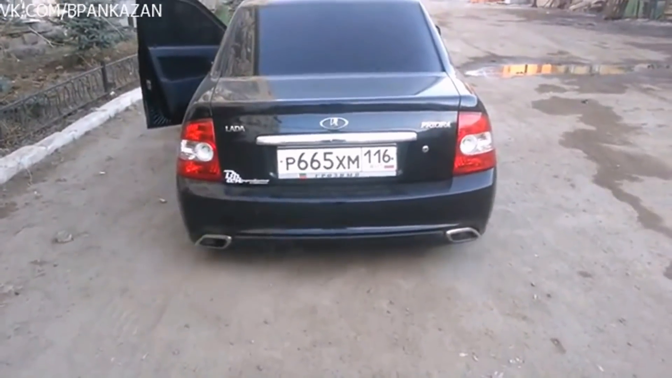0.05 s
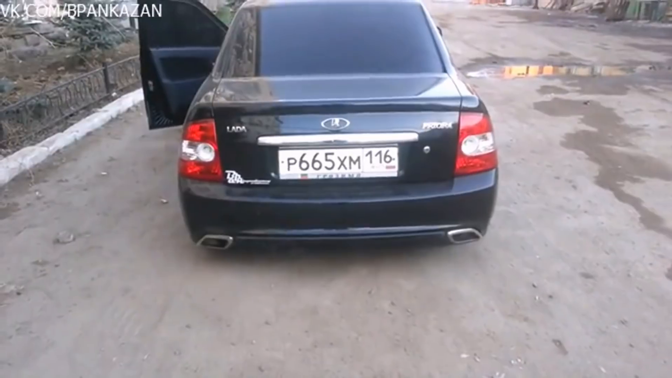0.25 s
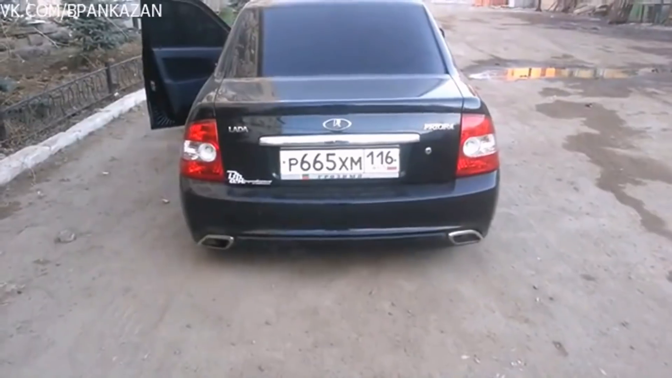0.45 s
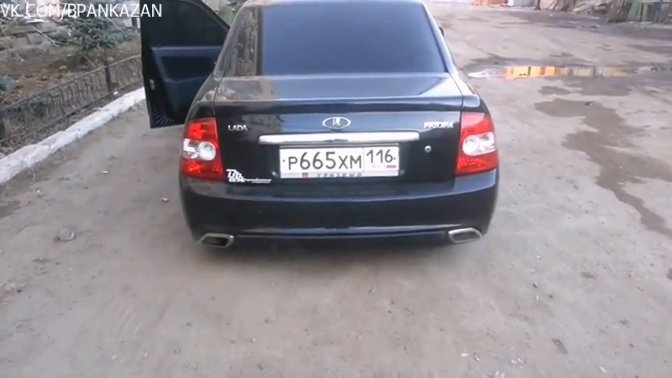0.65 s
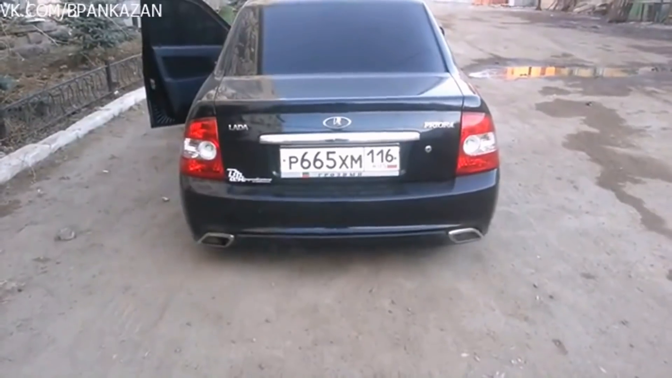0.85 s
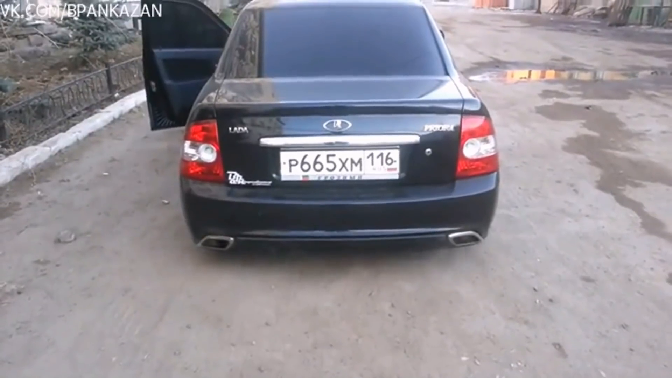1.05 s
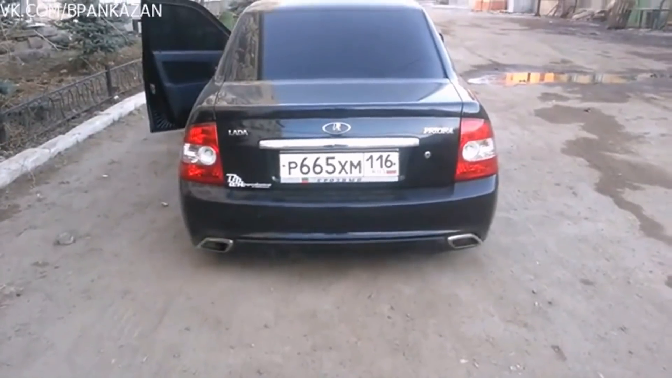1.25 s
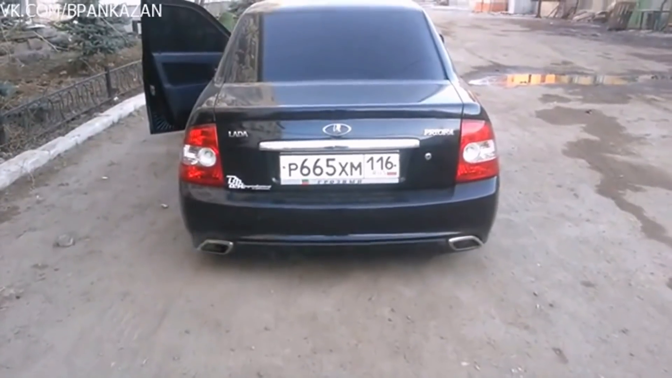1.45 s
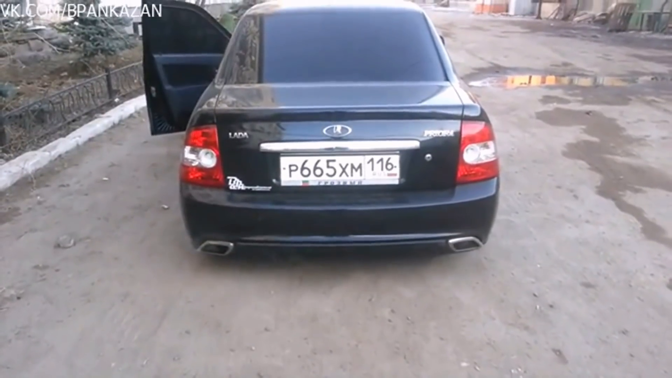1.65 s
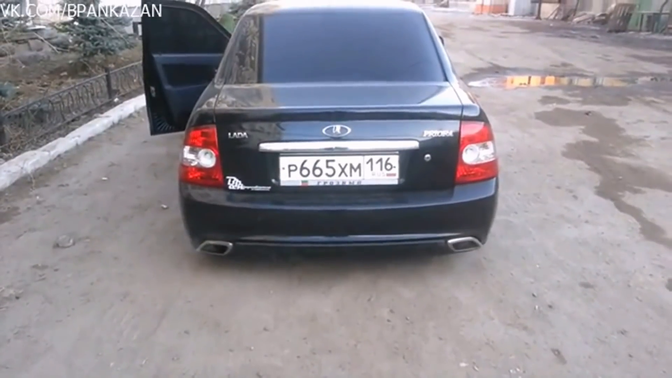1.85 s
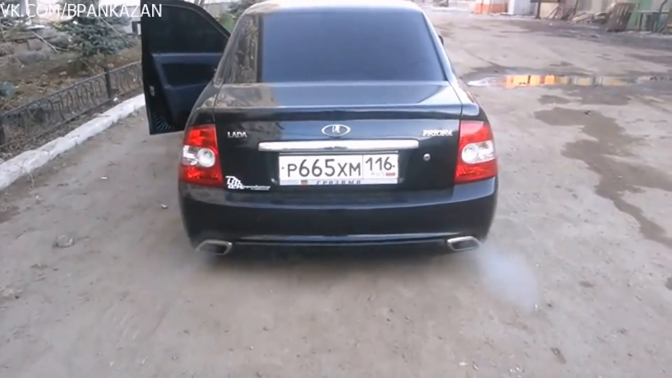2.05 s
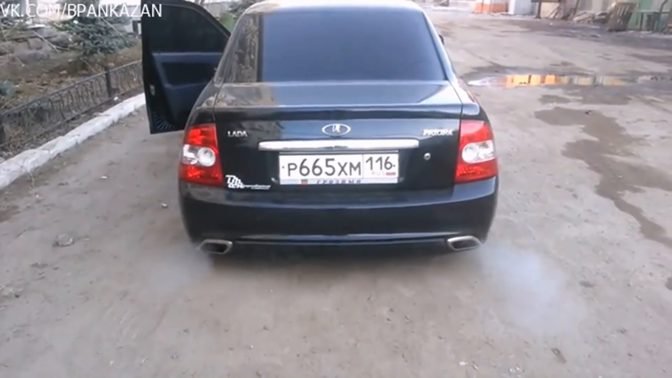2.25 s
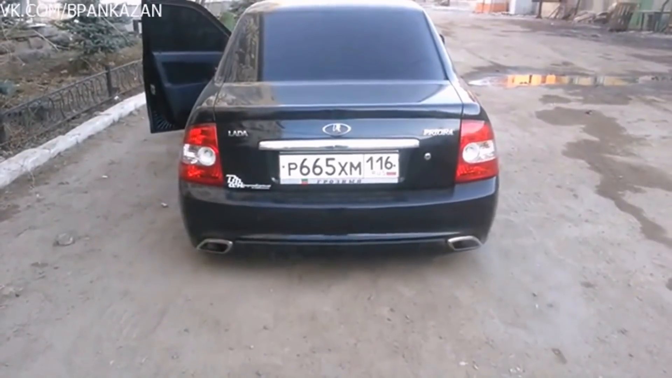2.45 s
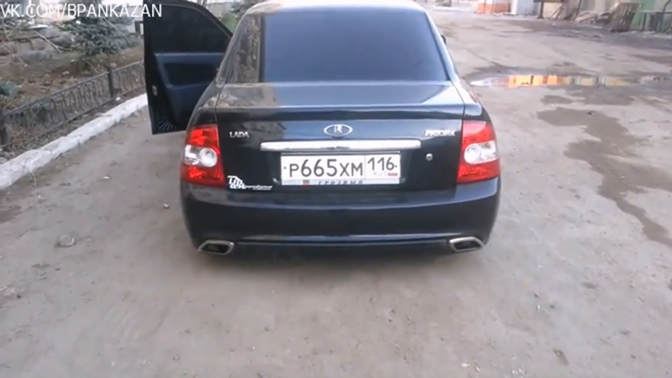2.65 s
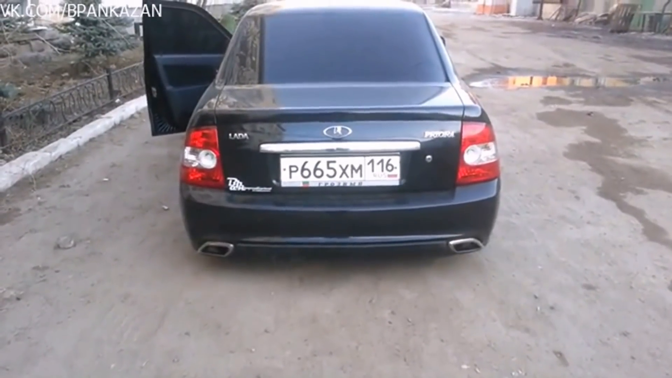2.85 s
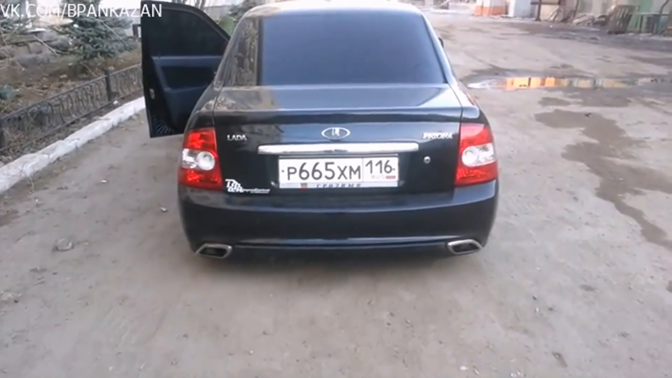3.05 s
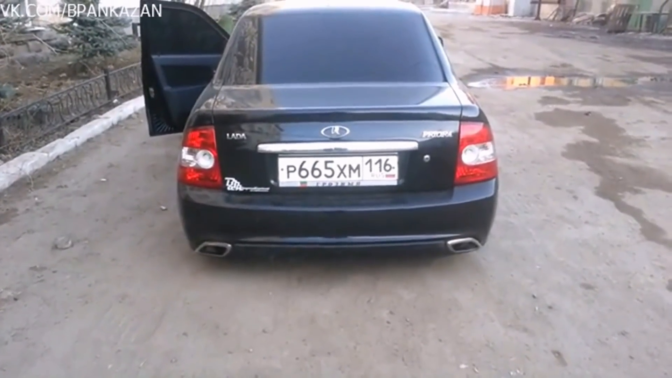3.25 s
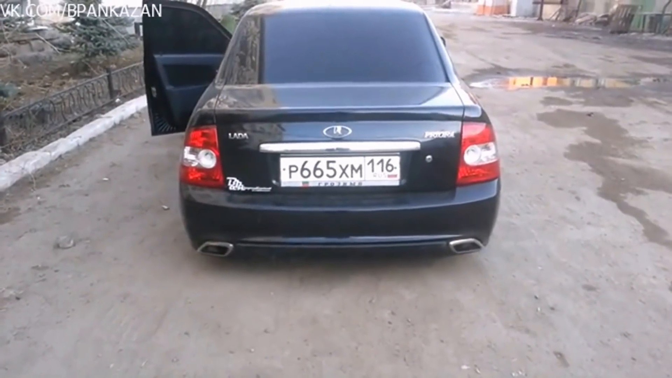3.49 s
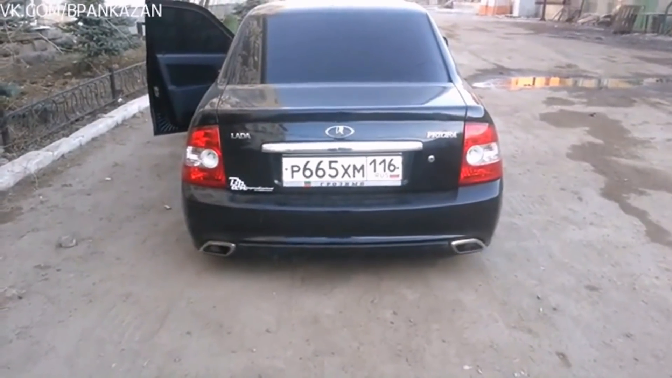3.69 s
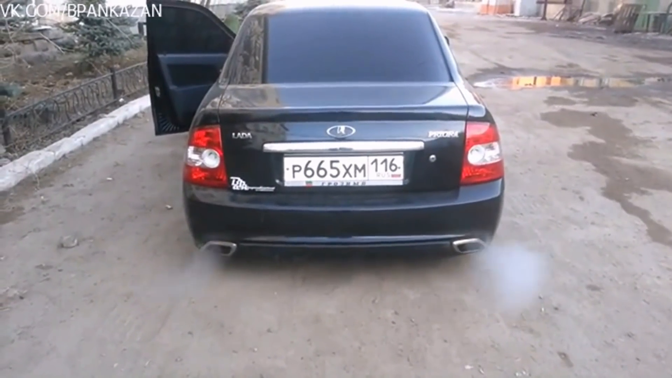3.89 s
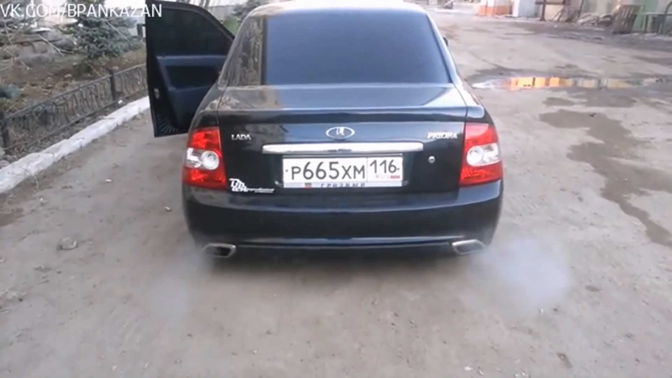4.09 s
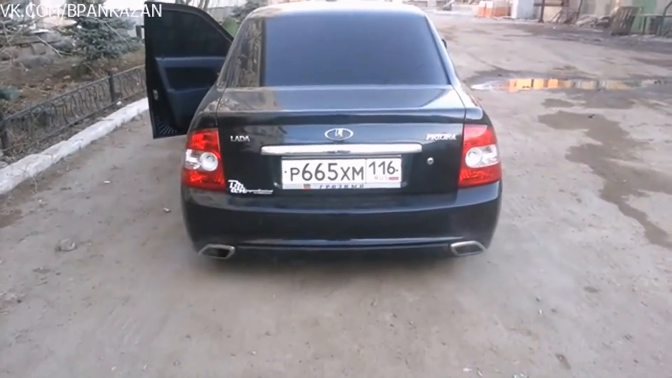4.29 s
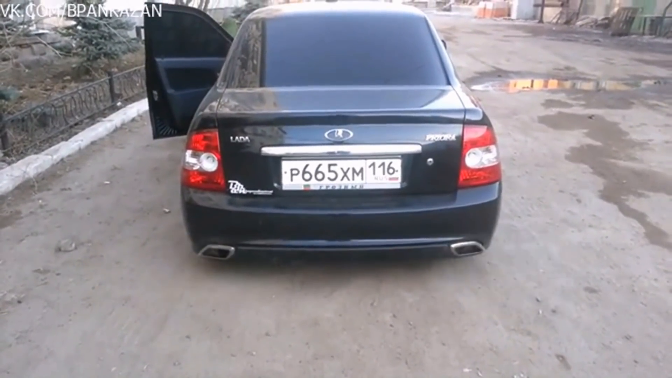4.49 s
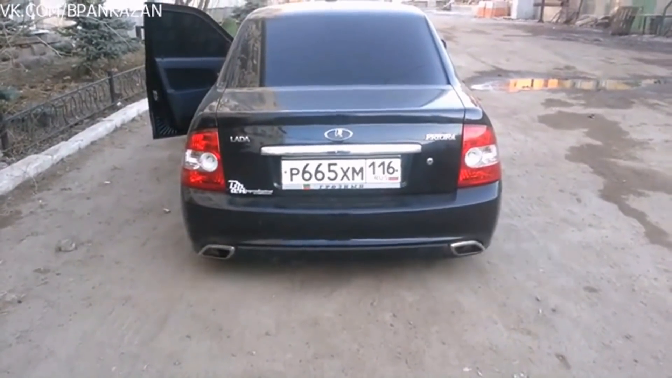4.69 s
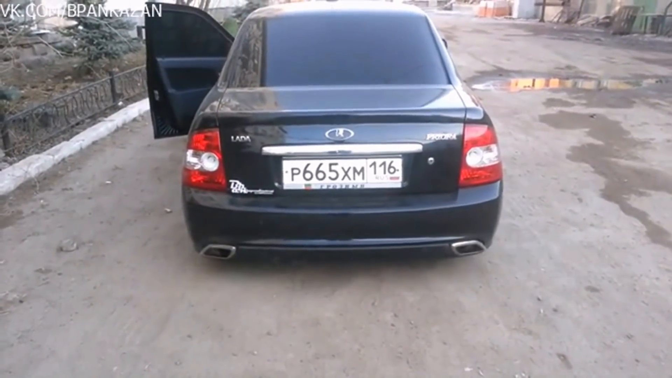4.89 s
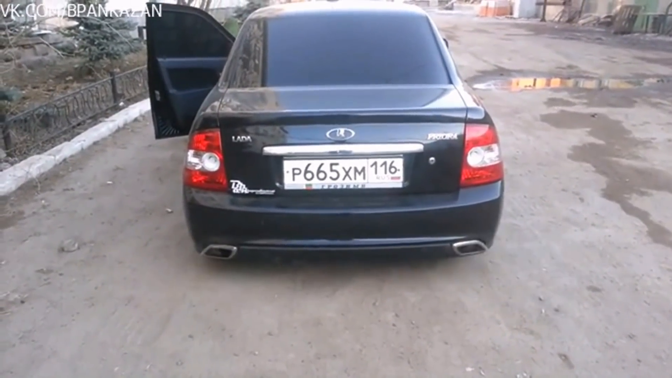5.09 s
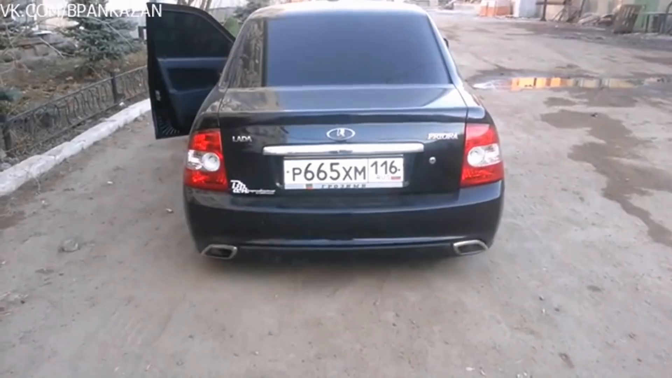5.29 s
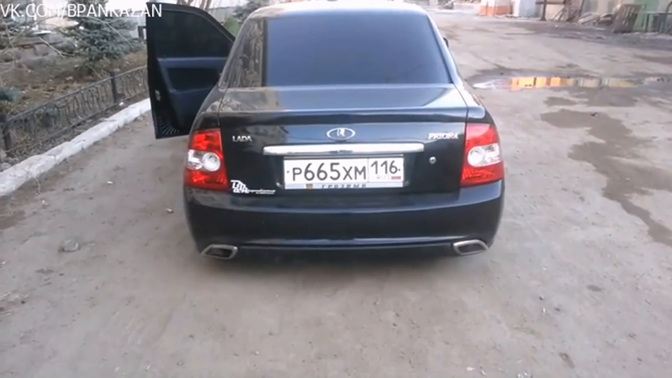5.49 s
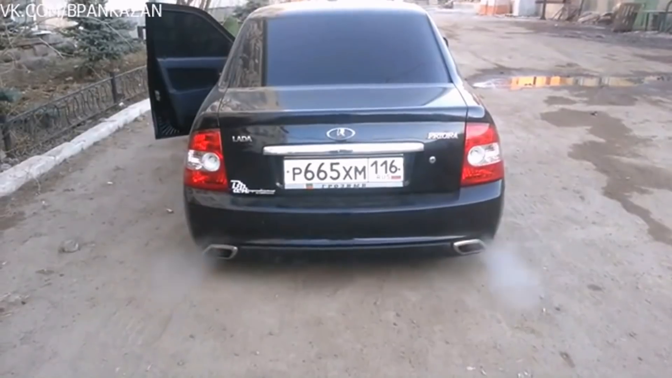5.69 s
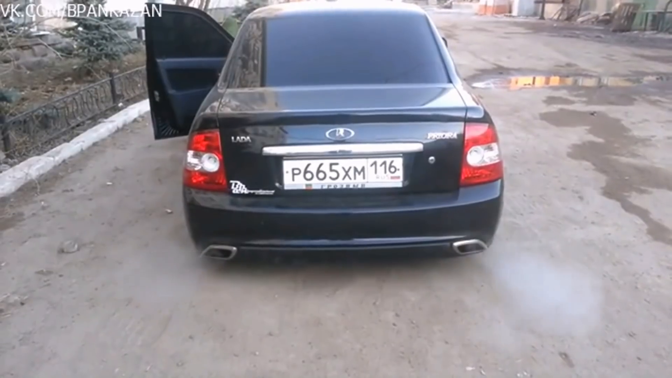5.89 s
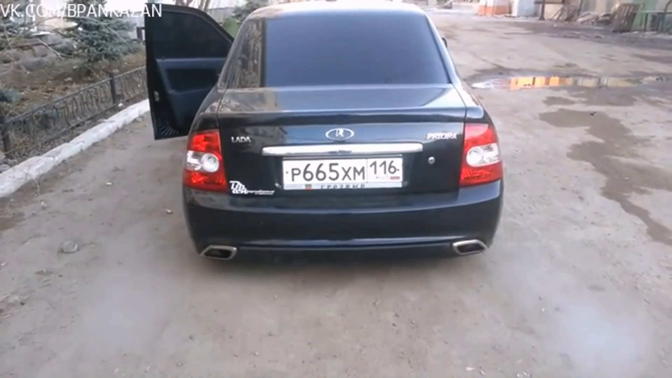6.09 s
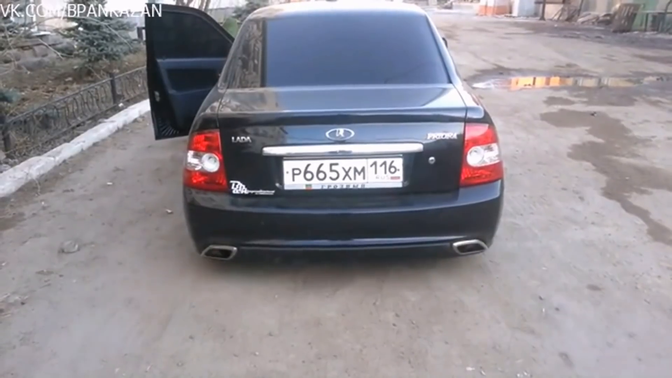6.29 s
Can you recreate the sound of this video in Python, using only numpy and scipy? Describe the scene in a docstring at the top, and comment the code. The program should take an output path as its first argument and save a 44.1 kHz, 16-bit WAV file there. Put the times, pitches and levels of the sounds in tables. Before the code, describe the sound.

Heard from just behind the tailpipes in an outdoor yard, a car's loud exhaust burbles unevenly over a low boom. Three sharp revs follow, each opening with barking cracks and rising into a harsh rasp with a bright, distorted sizzle. The engine pops and sinks back toward idle after the first two, while the third revs highest. Nearby walls add a brief echo.

```python
"""A ragged, booming idle, then three hard blips: a four-cylinder car with a sports exhaust in a yard,
the stereo microphone close behind its tailpipes. Engine speed and throttle drive the exhaust's level.
Each firing rings the pipe; under throttle the pulses steepen into a rasp, and it pops as the revs fall.
The silencer booms on one low note, the walls answer, and the loudest pulses overload the microphone."""
import sys
import numpy as np
from scipy import signal
from scipy.fft import rfft, irfft, next_fast_len
from scipy.io import wavfile
from scipy.ndimage import uniform_filter1d, map_coordinates

SR = 44100
rng = np.random.default_rng(int(sys.argv[2]) if len(sys.argv) > 2 else 0)


def transcribe(signal):
    """Save signal, clipped to [-1, 1], as a 16-bit WAV file at the path in sys.argv[1]."""
    frames = np.atleast_2d(signal).T
    limited = np.clip(frames, -1, 1)
    pcm = np.round(limited * 32767).astype(np.int16)
    wavfile.write(sys.argv[1], SR, pcm)


N = 279153


def amp(db):
    """Decibels to gain."""
    return 10 ** (np.asarray(db) / 20)


def unit(x):
    """Scaled to rms 1."""
    return x / np.sqrt(np.mean(x ** 2) + 1e-20)


def even(x, span_s=0.17):
    """Scaled to rms 1 over every short stretch."""
    size = int(span_s * SR / 2)
    power = uniform_filter1d(uniform_filter1d(np.atleast_2d(x ** 2).mean(0), size), size)
    return x / np.sqrt(np.abs(power) + 1e-6 * np.mean(power))


def along(points, hz):
    """(Hz, value) points read on a log axis."""
    freqs, values = np.transpose(points)
    return np.interp(np.log(hz + 1), np.log(freqs + 1), values)


def curve(rows):
    """(seconds, value) points read at every sample."""
    return np.interp(np.arange(N) / SR, *np.transpose(rows))


def wobble(rate):
    """A smooth random curve, rate knots a second."""
    return map_coordinates(rng.standard_normal(int(N * rate / SR) + 4), [np.arange(N) * rate / SR])


def noise():
    """White noise, unrelated left and right."""
    return rng.standard_normal((2, N))


def impulses(times, sizes):
    """Single spikes at the given times."""
    return np.bincount(np.round(np.asarray(times) * SR).astype(int), sizes, N)[:N]


def fade(x, life_s):
    """Every impulse in x starts a decay from its own height."""
    return signal.lfilter([1], [1, -np.exp(-1 / (life_s * SR))], x)


def filtered(x, response):
    """x through a complex frequency response."""
    size = next_fast_len(N + SR // 2)
    return irfft(rfft(x, size) * response(np.fft.rfftfreq(size, 1 / SR)), size)[..., :N]


def coloured(x, spectrum):
    """x shaped by a spectrum, at rms 1."""
    return unit(filtered(x, lambda hz: amp(along(spectrum, hz))))


def ring(x, modes, low_hz, high_hz):
    """x through resonances of alternating sign, falling steeply outside the band."""
    def body(hz):
        return sum((-1) ** k * amp(db) * 1j * hz * width / (centre ** 2 - hz ** 2 + 1j * hz * width)
                   for k, (centre, width, db) in enumerate(modes))
    band = signal.butter(3, [low_hz, high_hz], 'band', fs=SR, output='sos')
    return signal.sosfilt(band, filtered(x, body))


# The yard's background. Each row: frequency in Hz, relative level in dB.
AIR_SPECTRUM = [(100, -1.5), (2500, 10), (6000, -21), (10000, -5), (14500, 0.5), (15500, -35)]

def air(level_db=-61):
    """A faint, steady hiss all round the microphone."""
    return coloured(noise(), AIR_SPECTRUM) * amp(level_db)


# The yard's reverberation. Each row: frequency in Hz, seconds to fall 60 dB.
YARD_DECAY = [(150, 0.085), (1000, 0.27), (4000, 0.12), (12000, 0.048)]
# The walls' answer. Each row: frequency in Hz, relative level in dB.
WALL_ECHO = [(100, -14), (300, -3.5), (600, -2.5), (1200, -2.5), (3000, 8.5), (10000, -6)]

def yard(x, delay_samples=250):
    """Walls and kerb scatter the sound differently to each side of the microphone."""
    hz, t, bands = signal.stft(rng.standard_normal((2, SR // 2)), SR, nperseg=256)
    decay = amp(-60 * t / along(YARD_DECAY, hz)[:, None])
    tail = signal.istft(bands * decay, SR, nperseg=256)[1]
    delayed = np.pad(x, (delay_samples, 0))[None]
    wet = signal.fftconvolve(delayed, tail / np.linalg.norm(tail[0]), axes=1)[:, :N]
    return filtered(wet, lambda f: amp(along(WALL_ECHO, f) - 10.5))


# Ticks at the left microphone port. Each row: start in seconds, relative level in dB.
TICKS = [(0.2435, -2.5), (0.6627, -1.5)]
# Their colour. Each row: frequency in Hz, gain in dB.
TICK_SPECTRUM = [(400, 6), (900, 2), (1600, 6.5), (3500, 5.5), (6000, -10.5), (10000, -11.5), (15000, -44)]

def ticks():
    """Two very short dry snaps on the left only: a pull and a push, with a trace of noise."""
    starts, db = np.transpose(TICKS)
    spikes = impulses(starts, amp(db))
    snap = 5 * spikes + 0.4 * noise()[0] * fade(spikes, life_s=0.0012)
    return np.outer([1, 0], filtered(snap, lambda hz: -1j * amp(along(TICK_SPECTRUM, hz))))


def buffet(puff_db):
    """The strongest pressure waves stir the air at the two microphone ports."""
    rumble = [(10, -16), (30, 1.5), (60, -7), (150, -7), (400, -58), (800, -120)]  # Hz, dB
    return coloured(noise() + 1.1 * noise()[0], rumble) * amp(1.49 * puff_db + 6.5)


# A bright sizzle, like microphone overload. Each row: frequency in Hz, relative level in dB.
SIZZLE_SPECTRUM = [(1650, -33), (2800, -20), (3160, -8.5), (3810, -5), (4610, -7.5), (5530, -1), (6690, -5),
                   (7540, 2), (8320, -4.5), (9440, 0), (12200, -6), (14000, -5.5), (15000, -21.5)]
# Its balance. Each row: frequency in Hz, left minus right in dB.
SIZZLE_PAN = [(2500, 21.5), (4400, -4), (8000, -16), (15000, -2.5)]

def sizzle(gate):
    """Bright gated hiss, mostly on the right."""
    def pan(hz):
        lean_db = along(SIZZLE_PAN, hz)
        return amp(np.outer([0.5, -0.5], lean_db)) / np.cosh(lean_db * np.log(10) / 40)
    return filtered(coloured(noise(), SIZZLE_SPECTRUM), pan) * gate


# Gas leaving the tailpipes. Each row: frequency in Hz, relative level in dB.
RUSH_SPECTRUM = [(320, -39), (550, 4), (590, -32), (660, -7), (872, -7), (1240, -15.5), (1730, -16.5),
                 (1910, -20.5), (2350, -18), (2780, -25), (9640, -45), (14500, -71), (15500, -79)]

def rush(pulses, rasp_db, low_hz=650):
    """Even off the throttle, gas leaves as a smooth rush; a sizzle joins it as it grows."""
    flow_db = np.minimum(rasp_db, -38)
    stream = coloured(noise() + 0.61 * noise()[0], RUSH_SPECTRUM)
    gas = even(stream * (1.8 + fade(pulses, life_s=0.007)))
    gas = signal.sosfilt(signal.butter(2, low_hz, 'high', fs=SR, output='sos'), gas)
    return unit(gas) * amp(flow_db + 7.5) + sizzle(amp(1.65 * flow_db + 13))


# Three hard blips, and the light feeds that hold the idle. Each row: opening time, shut time and
# closing length in seconds, then relative levels of drone, roar, rasp and crackle in dB.
THROTTLE = [(-.06, 0.082, 0.069, -20, -30, -41, -53), (0.207, 0.33, 0.08, -8.5, -21.5, -53, -72),
            (0.412, .66, 0.05, -10, -19.5, -38, -65), (0.827, 1.071, 0.028, -21.5, -30, -39.5, -57),
            (1.884, 2.28, 0.15, -13, -15.5, -21.5, -30.5), (2.65, 2.962, 0.023, -34, -34, -39, -53.5),
            (3.643, 4.102, .13, -14.5, -17, -23, -30), (4.76, 5.041, 0.024, -19, -31.5, -37, -51),
            (5.513, 6.095, .16, -16, -18, -23.5, -29.5)]

def throttled(levels_db, attack_s, release_s, order=1):
    """Gain that rises as the throttle opens, holds at each opening's level and falls as it shuts."""
    t = np.arange(N) / SR
    opens, shuts = np.transpose(THROTTLE)[:2]
    return sum(amp(db) * np.clip((t - start) / attack_s, 0, 1)
               * np.clip((end - t) / release, 0, 1) ** order
               for start, end, db, release in np.broadcast(opens, shuts, levels_db, release_s))


def crackle(pulses):
    """Crackling sizzle, like microphone overload; it pulses with the firings while the throttle is open."""
    level = throttled(np.transpose(THROTTLE)[-1], attack_s=0.16, release_s=0.037)
    return sizzle(even(0.69 + fade(pulses ** 2, life_s=0.0063)) * level)


# Hard firings as the throttle opens, and pops as it shuts.
# Each row: start in seconds, relative levels of crack and bark in dB.
BANGS = [(1.8947, -28, -37), (1.9209, -34, -7), (1.9491, -21.5, -16), (1.993, -14, -5), (2.0313, -10, -1.5),
         (2.1612, -10.5, -20), (2.2078, -25, -14), (2.2627, -19, -6), (2.5655, -38, -18),
         (3.6663, -24, -17), (3.6948, -16.5, -9), (3.714, -9, -1), (3.7535, -12, -4.5),
         (3.7716, -15.5, -3.5), (4.0603, -20, -1), (4.1085, -17.5, -11.5), (4.2335, -18, -12),
         (4.3262, -12.5, -11), (4.397, -24.5, -1), (5.5413, -36, -11), (5.5664, -21.5, -18),
         (5.608, -31, 1), (5.628, -15.5, -4), (5.6463, -14, -4.5), (6.2923, -7, -8)]

def bangs(tips_db=7.5):
    """A violent firing cracks and rings the tips; at low revs its big charge also barks in the pipe."""
    starts, crack_db, bark_db = np.transpose(BANGS)
    cracks = impulses(starts, amp(crack_db - 6.5))
    charge = np.minimum(40 / np.interp(starts, *np.transpose(ENGINE_SPEED)), 1) ** 2
    blasts = impulses(starts, charge * amp(bark_db + 41.5))
    barks = ring(blasts, BOX_MODES + PIPE_MODES, low_hz=165, high_hz=670)
    tips = ring(fade(cracks, life_s=0.015) * noise(), TIP_MODES, low_hz=600, high_hz=3080)
    burst = 1.42 * (fade(cracks, life_s=0.0061) - fade(cracks, life_s=0.0014))
    trail = 0.083 * fade(cracks, life_s=0.064)
    return barks + tips * amp(tips_db) + sizzle(burst + trail)


def boom_phase(note_hz=137.9, wander_hz=1.6):
    """Phase of the silencer's slightly wandering low note."""
    return 2 * np.pi * np.cumsum(note_hz + wander_hz * wobble(6)) / SR + 0.37 * wobble(35)


# The silencer's low note. Each row: time in seconds, relative level in dB.
BOOM_LEVEL = [(0.0, -20.5), (0.1, -33), (0.26, -20), (0.72, -11.5), (0.77, -28), (1.04, -16), (1.09, -21),
              (1.41, -20.5), (1.55, -33), (1.6, -14.5), (1.67, -28), (1.73, -19), (1.82, -37), (1.85, -19),
              (1.92, -17.5), (2.03, -26), (2.61, -27.5), (2.64, -16), (2.71, -33), (2.79, -12),
              (2.87, -30.5), (3.17, -29.5), (3.23, -20.5), (3.52, -24.5), (3.6, -13), (4.02, -32.5),
              (4.14, -20), (4.28, -31.5), (4.49, -17), (4.74, -26), (4.81, -15.5), (4.88, -21.5),
              (5.09, -23.5), (5.15, -34), (5.61, -18), (5.66, -32.5), (5.75, -19), (5.8, -49),
              (5.92, -27.5), (6.33, -24)]
# The silencer's broad resonances. Each row: centre in Hz, width in Hz, gain in dB.
SILENCER_MODES = [(79, 39, -3), (113, 36, 2.5), (149, 48, 1.5)]

def silencer(pulses, phase, puff_db, flutter_db=1.0, lag_rad=0.061):
    """The silencer's air rings on one low note, above the soft thud of the puffs."""
    note_db = curve(BOOM_LEVEL) + flutter_db * wobble(14)
    port_phase = phase + lag_rad * np.array([[-1], [1]])  # the note reaches the right port first
    note = np.sqrt(2) * np.sin(port_phase) * amp(note_db + 0.47)
    puffs = ring(pulses + 0.068 * noise()[0], SILENCER_MODES, low_hz=55, high_hz=193)
    return note + even(puffs, span_s=0.25) * amp(puff_db + 5.5)


def swirl(pulses, life_s):
    """Turbulence that trails every firing, at rms 1."""
    return unit(fade(pulses, life_s) * noise()[0])


# Crank harmonics at high revs. Each row: multiple of the firing rate, relative level in dB.
CRANK_HARMONICS = [(11 / 4, 2), (13 / 4, 0), (15 / 4, 0), (17 / 4, 3), (19 / 4, 2), (21 / 4, 0)]

def singing(rate, centre_hz=312, width_hz=60):
    """Each crank harmonic swells, unsteadily, as it slides through the rear box's resonance."""
    phase = 2 * np.pi * np.cumsum(rate) / SR
    return sum(amp(db + 1.8 * wobble(45)) * np.sin(k * phase + 0.53 * wobble(40))
               / np.hypot(1, 2 * (k * rate - centre_hz) / width_hz) for k, db in CRANK_HARMONICS)


# The rear box's resonances. Each row: centre in Hz, width in Hz, gain in dB.
BOX_MODES = [(228, 112, -11.5), (275.5, 18.3, 5.5), (309, 29.5, 3), (382.2, 71, -10)]

def drone(pulses, rate, phase):
    """The rear box burbles; it hums the silencer's octave at idle and sings crank harmonics at speed."""
    fast = np.clip((rate - 45) / 25, 0, 1)
    push = (0.33 + 0.47 * fast) * unit(pulses) + 0.5 * swirl(pulses, life_s=0.057)
    burble = even(ring(push, BOX_MODES, low_hz=194.6, high_hz=395))
    octave = np.sin(2 * phase + 0.66 * wobble(25))
    return even(burble + 0.92 * (1 - fast) * octave + 1.12 * fast * even(singing(rate)))


# The pipe's resonances. Each row: centre in Hz, width in Hz, gain in dB.
PIPE_MODES = [(392, 63, 5), (430, 87.6, 11), (426, 82, -14), (540.8, 10, 4)]

def roar(pulses, load):
    """Firings ring the pipe: soft and turbulent at idle, hard kicks under throttle."""
    kicks = (0.2 + 0.49 * load ** 2) * unit(pulses)
    turbulence = (0.75 - 0.22 * load ** 2) * swirl(pulses, life_s=0.049)
    return even(ring(kicks + turbulence, PIPE_MODES, low_hz=350, high_hz=1080))


# The tailpipe tips, nearest the microphone. Each row: resonance in Hz, width in Hz, gain in dB.
TIP_MODES = [(862, 28, 15.5), (997, 46, 5), (1283, 110, 2.5), (1508, 70, 3.5), (1654.5, 90, 2),
             (2083, 190, -1), (2320, 160, 1), (2546, 420, -7)]

def rasp(pulses, load):
    """Under throttle the pulses steepen into shocks that rasp in the tips."""
    shocks = pulses ** 1.06
    spray = unit(fade(shocks, life_s=0.0013) * noise())
    tips = ring(unit(shocks) + 1.14 * spray, TIP_MODES, low_hz=834, high_hz=3150)
    return even(tips) * (0.095 + 1.29 * load)


# The exhaust with the throttle shut.
# Each row: firings per second, then relative levels of drone, roar, rasp and puff in dB.
COASTING = [(27.8, -25.5, -39, -47, -40), (40.9, -21.5, -35.5, -44.5, -38.5),
            (61, -12.5, -24, -40.5, -34.5), (81.3, -10, -18.5, -41.5, -33), (110, -9, -20.5, -40.5, -32.5)]

def flow(rate, body_attack_s=0.058, sag_db=4, lug_db=16.5, lug_below_rate=76):
    """Drone, roar, rasp and puff in dB, and load 0-1: engine speed sets a base, the throttle adds."""
    speeds, *columns = np.transpose(COASTING)
    drone_db, roar_db, rasp_db, puff_db = [np.interp(rate, speeds, column) for column in columns]
    closing_s, drone_open, roar_open, rasp_open = np.transpose(THROTTLE)[2:6]
    fed = lambda base_db, extra: 20 * np.log10(np.hypot(amp(base_db), extra))  # powers add
    bite = amp(0.14 * (rate - 62.5))  # the rasp hardens with speed
    rasp_feed = throttled(rasp_open, attack_s=0.052, release_s=closing_s, order=2)  # and dies first
    rasp_db = fed(rasp_db, bite * rasp_feed)
    load = np.clip((rasp_db + 45.5) / 11, 0, 1)
    lugging = np.clip((lug_below_rate - rate) / (lug_below_rate - rate.min()), -0.5, 1)
    drone_db = fed(drone_db, throttled(drone_open, body_attack_s, closing_s))
    drone_db -= sag_db * load * (1 - lugging)  # gives way to rasp under load at high revs
    roar_db = fed(roar_db, throttled(roar_open, body_attack_s, closing_s))
    puff_db += lug_db * load ** 3 * lugging  # extra puff when pulling from low revs
    flutter = wobble(22) * (1 - 0.5 * load)  # uneven combustion, steadier under load
    return drone_db + 2.1 * flutter, roar_db + 1.5 * flutter, rasp_db + 2 * flutter, puff_db, load


# The engine's speed. Each row: time in seconds, firings per second.
ENGINE_SPEED = [(0, 39), (.4, 44.3), (.7, 51), (1.1, 29.6), (1.83, 28.3), (2.03, 54.4), (2.2, 84),
                (2.8, 54), (3.1, 40), (3.6, 37.8), (3.78, 48), (3.92, 84.7), (4.05, 87), (4.65, 58.5),
                (5.5, 28.7), (5.72, 70), (5.9, 118.3), (6.0, 116), (6.33, 112)]
# Each entry: one cylinder's pulse strength in dB.
CYLINDER_DB = [2, 2.5, -3, -3.5]

def firings(rate, jitter_s=0.00008, idle_jitter_s=0.00079, scatter_db=1.27, bang_db=3):
    """One pulse per firing; cylinders differ, slow running is ragged, and some firings are violent."""
    elapsed = np.cumsum(rate) / SR
    count = np.arange(1, int(elapsed[-1]))
    at = np.searchsorted(elapsed, count)
    slip, scatter = rng.standard_normal((len(count), 2)).T
    times = at / SR + (jitter_s + idle_jitter_s * (rate.min() / rate[at]) ** 2) * slip
    db = np.take(CYLINDER_DB, count, mode='wrap') + scatter_db * scatter
    # each bang takes the place of the nearest firing
    bang_times = np.transpose(BANGS)[0]
    nearest = np.abs(times - bang_times[:, None]).argmin(axis=1)
    times[nearest], db[nearest] = bang_times, bang_db
    return impulses(np.abs(times), amp(db))


def scene():
    """The exhaust from close behind the tailpipes, with the yard around it."""
    rate = curve(ENGINE_SPEED)
    pulses, phase = firings(rate), boom_phase()
    drone_db, roar_db, rasp_db, puff_db, load = flow(rate)
    pipe = roar(pulses, load) * amp(roar_db)
    tips = rasp(pulses, load) * amp(rasp_db - 3)
    box = drone(pulses, rate, phase) * amp(drone_db)
    direct = pipe + tips + box + silencer(pulses, phase, puff_db)
    close_noise = rush(pulses, rasp_db) + crackle(pulses) + buffet(puff_db)
    return direct + yard(direct.mean(axis=0)) + close_noise + bangs() + ticks() + air()


def record(dry, ceiling=0.55, hardness=5, top_hz=15500):
    """The microphone rounds off the loudest peaks and keeps nothing above its band limit."""
    squashed = dry / (1 + np.abs(dry / ceiling) ** hardness) ** (1 / hardness)
    return filtered(squashed, lambda hz: hz < top_hz)


dry = scene()
out = record(dry)
transcribe(out)
```